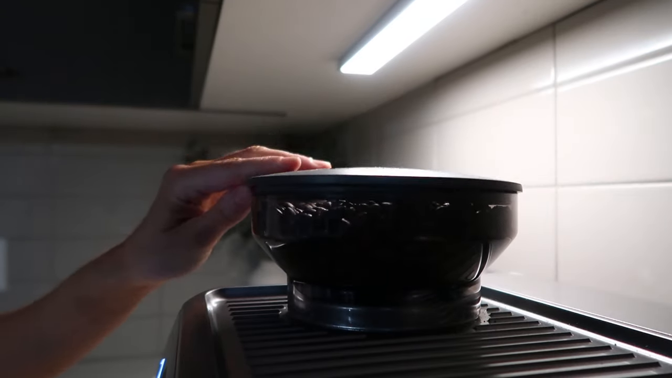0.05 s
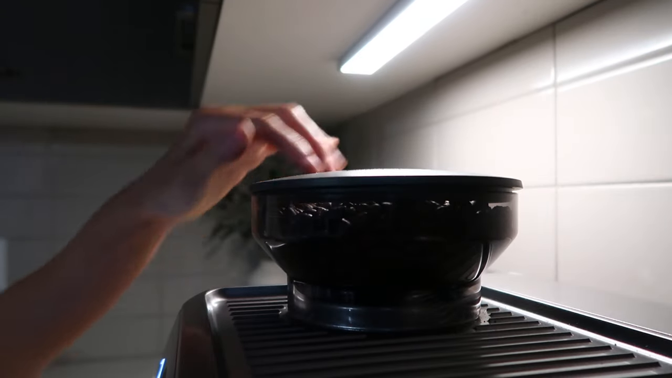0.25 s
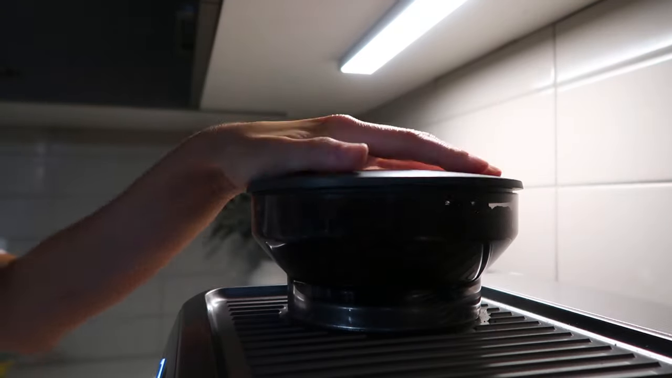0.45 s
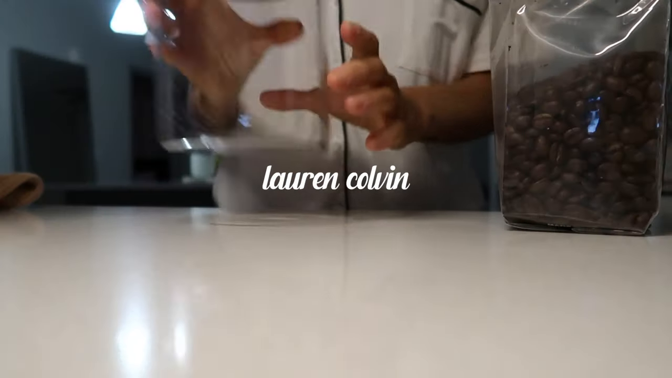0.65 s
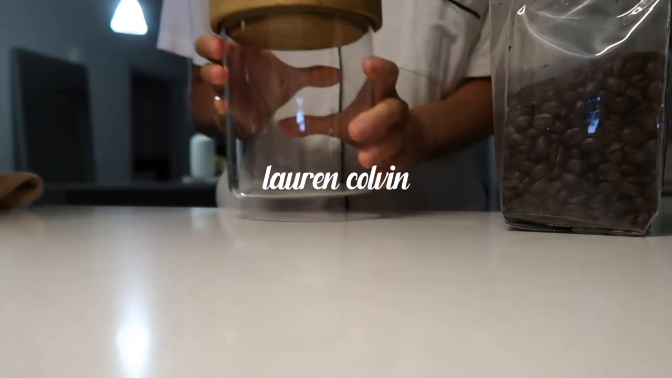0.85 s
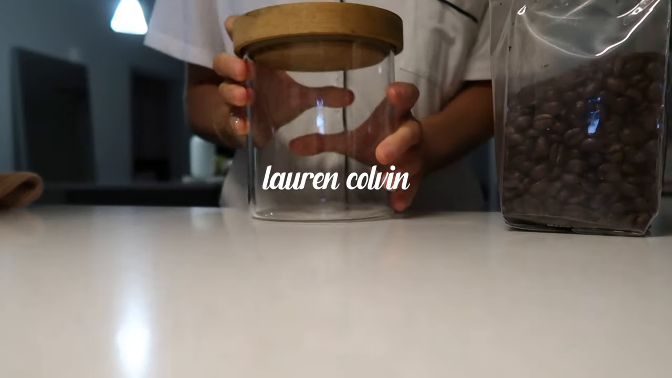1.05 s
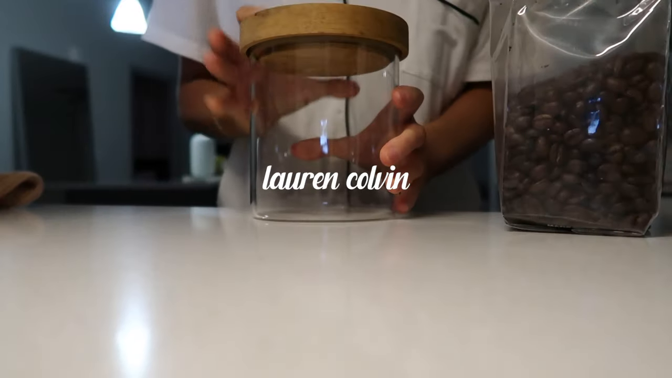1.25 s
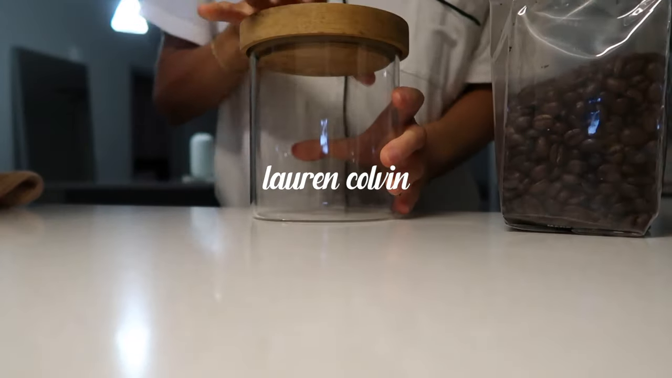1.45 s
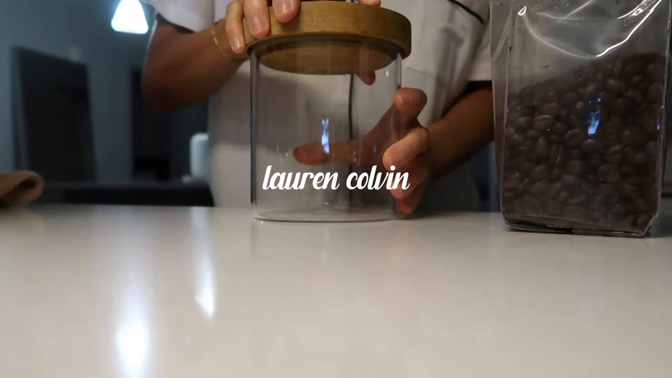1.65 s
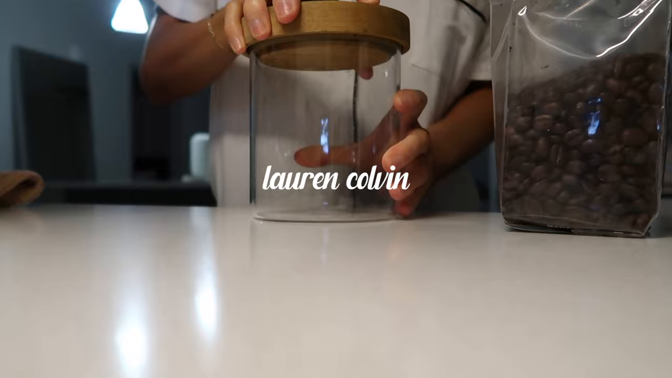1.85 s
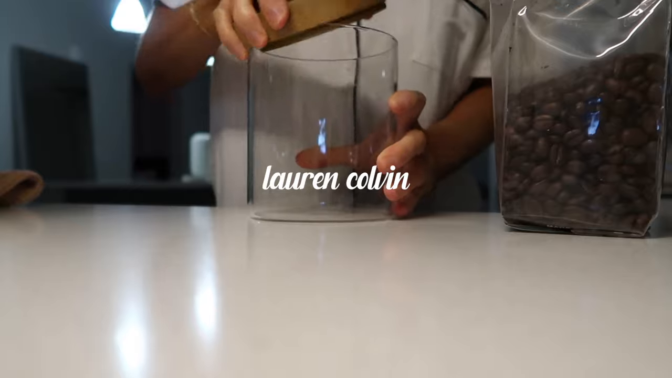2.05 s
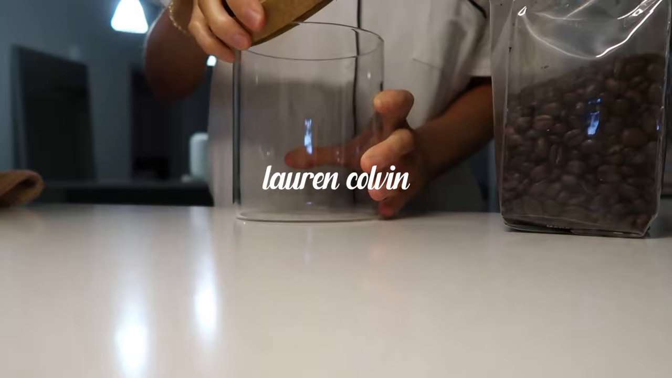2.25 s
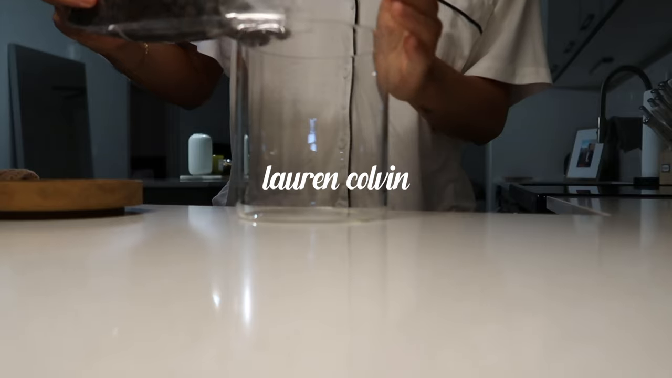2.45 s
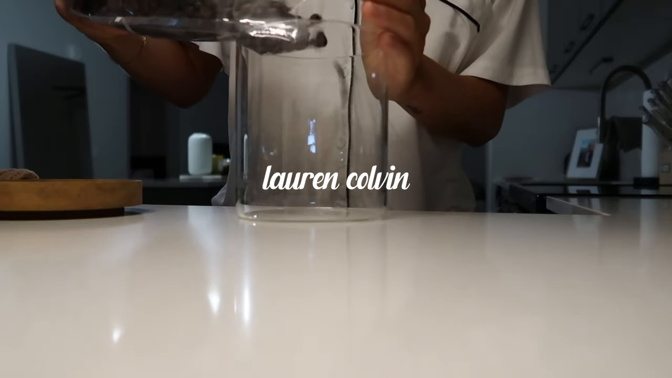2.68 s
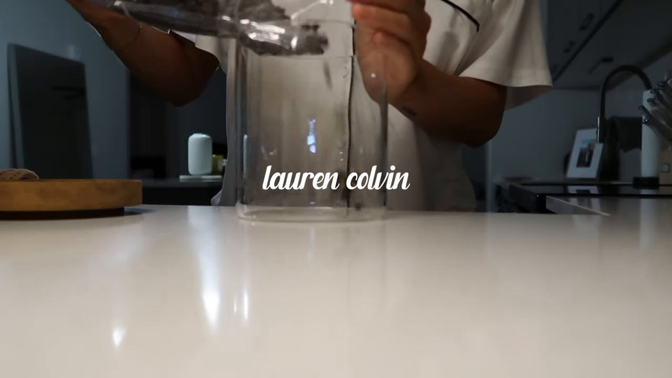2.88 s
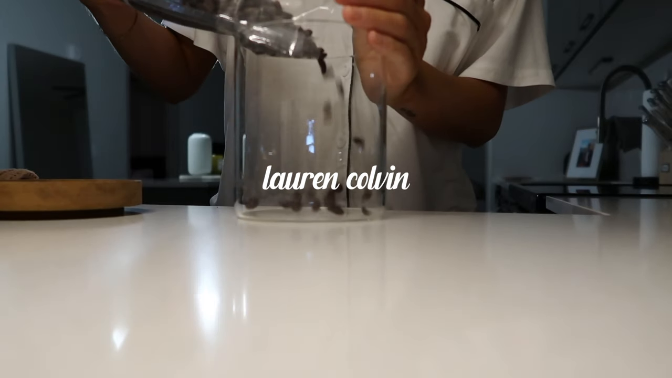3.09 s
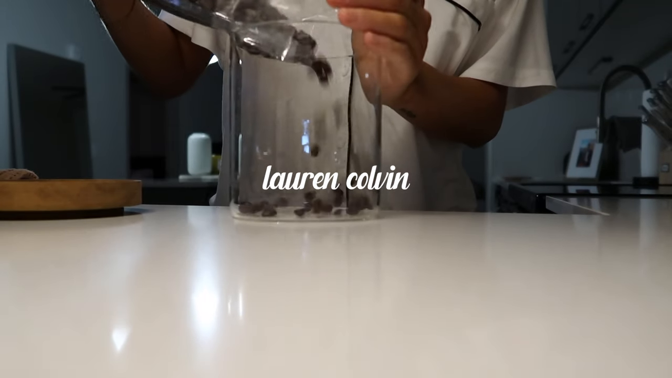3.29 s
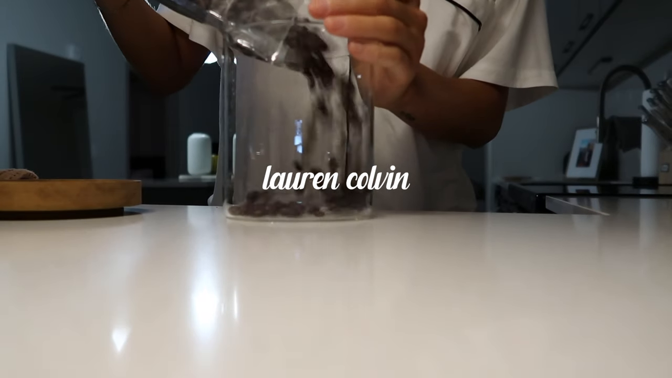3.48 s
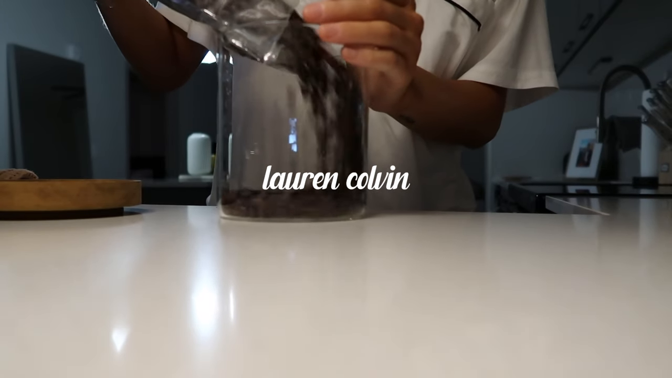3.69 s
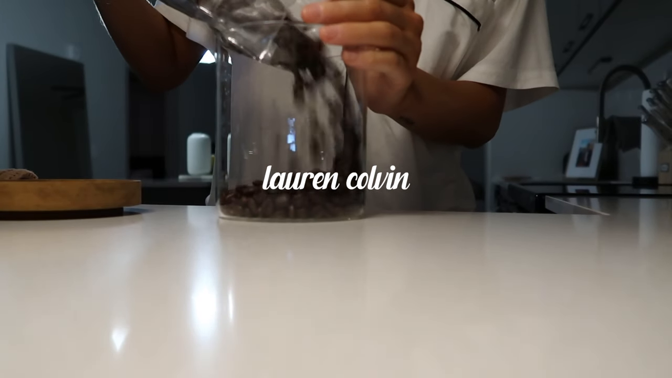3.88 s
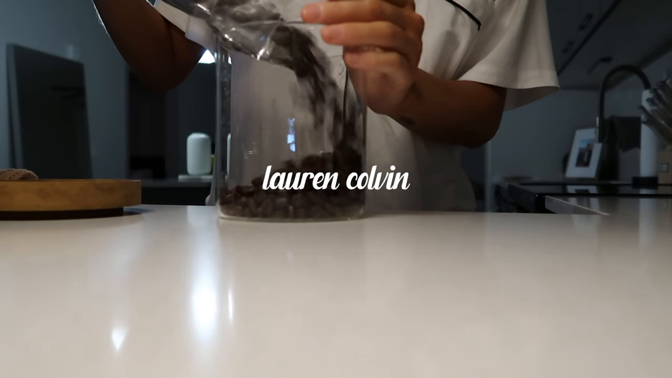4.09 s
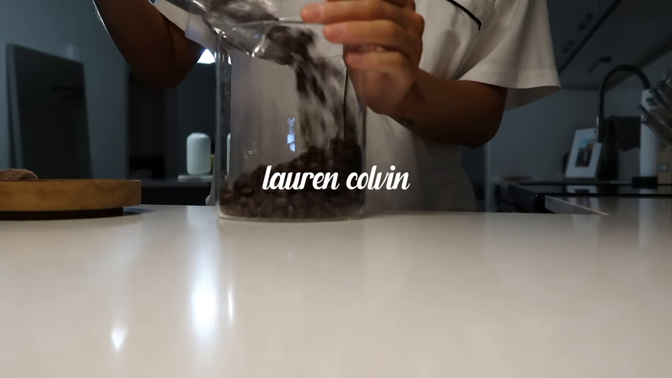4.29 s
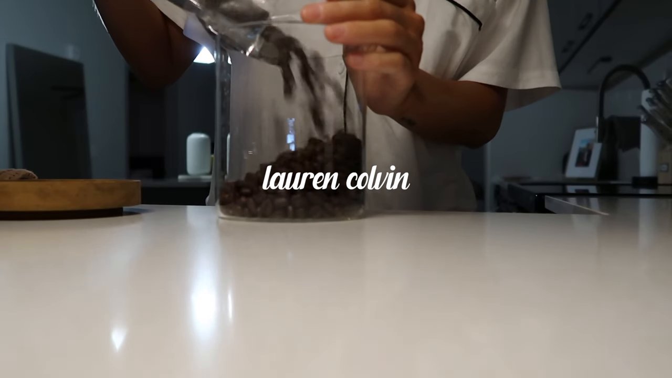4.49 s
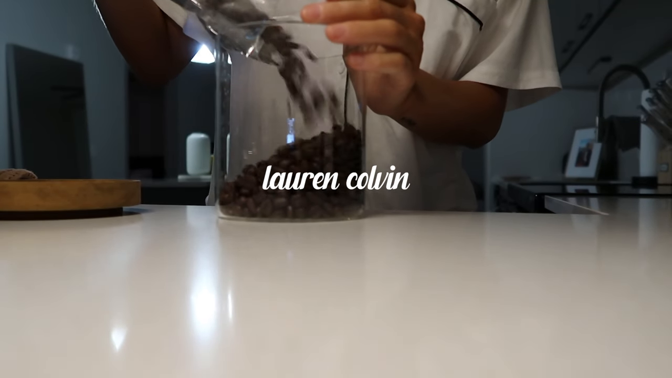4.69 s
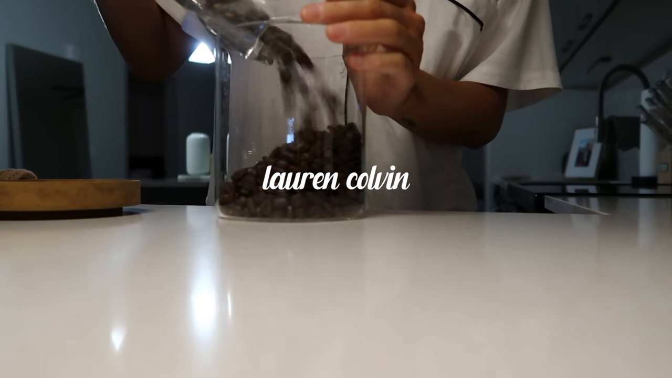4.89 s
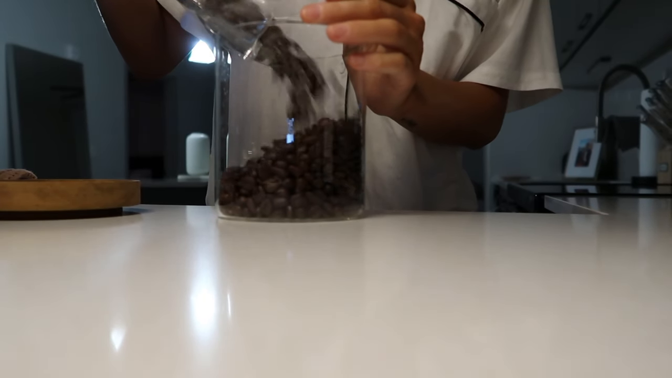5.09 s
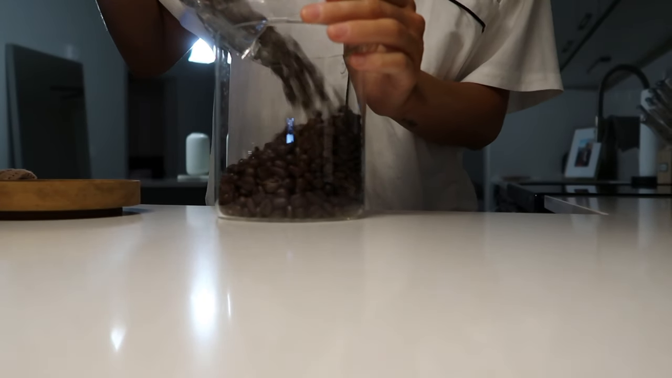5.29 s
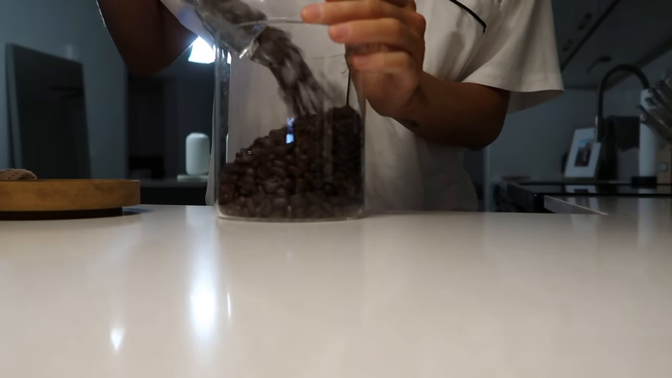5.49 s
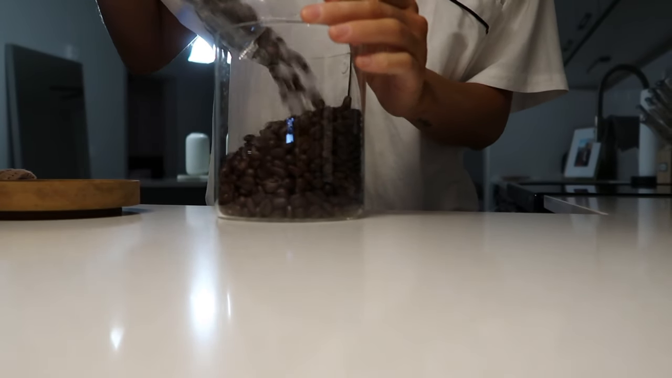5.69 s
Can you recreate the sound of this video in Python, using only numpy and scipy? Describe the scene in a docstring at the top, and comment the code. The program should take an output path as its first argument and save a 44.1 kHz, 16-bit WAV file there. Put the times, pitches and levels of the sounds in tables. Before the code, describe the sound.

A hand pats a plastic hopper lid, a glass jar and wooden lid knock on a counter, then coffee beans pour ringing into the jar.

```python
"""Coffee at a kitchen counter, heard from close by over a low hum. A hand pats a grinder's hopper lid (struck modes),
a glass jar is set down, its wooden lid knocks, its seal squeaks (wavering noise band) and pops, and the lid is laid aside.
Beans slide down a plastic bag (random impacts through crackle and modes), tick singly on the jar's bare base,
then swell to a stream whose collisions rattle, ring the glass wall and patter on the growing heap."""
import sys
import numpy as np
from scipy import signal
from scipy.fft import rfft, irfft, next_fast_len
from scipy.io import wavfile
from scipy.ndimage import uniform_filter1d

SR = 44100
rng = np.random.default_rng(int(sys.argv[2]) if len(sys.argv) > 2 else 0)


def unload_wav(signal):
    """Save mono or channel-first audio to the path in sys.argv[1] as 16-bit WAV at rate SR, clipped to [-1, 1]."""
    wavfile.write(
        sys.argv[1],
        SR,
        np.round(np.clip(np.atleast_2d(signal).T, -1, 1) * 32767).astype(np.int16),
    )


N = 253134
TIME = np.arange(N) / SR

# port difference against sum for blows, room tail and hum: freq_hz, ratio_db
KNOCK_WIDTH = [(60, -30), (400, -17.5), (3000, -16), (6000, -0.5), (12000, 7.5)]
POUR_START_S = 2.822
COVERED_S, COVERING_S = 3.895, 0.14   # base half muted by beans; how gradually


def from_db(db):
    """Decibels to gain."""
    return 10 ** (np.asarray(db) / 20)


def rms_one(x):
    """Scale to unit rms."""
    return x / np.sqrt(np.mean(x ** 2) + 1e-20)


def in_time(rows):
    """Each column of a curve at every sample."""
    s, *columns = np.transpose(rows)
    return [np.interp(TIME, s, column) for column in columns]


def at_hz(points, hz):
    """Read a spectrum on a log-frequency axis."""
    freq_hz, value = np.transpose(points)
    return np.interp(np.log(hz + 1), np.log(freq_hz), value)


def envelope(start_s, length_s, attack_s, release_db_per_s):
    """Linear attack, hold until length_s, release linear in dB."""
    age_s = TIME - start_s
    release_db = -release_db_per_s * np.maximum(age_s - length_s, 0)
    return np.clip(age_s / attack_s, 0, 1) * from_db(release_db)


def transition(middle_s, time_s):
    """Smooth change from 0 to 1."""
    return .5 + .5 * np.tanh((TIME - middle_s) / (2 * time_s))


def colour(x, spectrum):
    """Causal (minimum-phase) filter with the given gains."""
    size = 4096
    hz = np.arange(size // 2 + 1) * SR / size
    cepstrum = irfft(np.log(from_db(at_hz(spectrum, hz))))
    cepstrum[1:size // 2] *= 2   # fold to minimum phase
    cepstrum[size // 2 + 1:] = 0
    impulse_response = irfft(np.exp(rfft(cepstrum)))
    return signal.fftconvolve(x, impulse_response)[:N]


def resonance(x, hz, width_hz):
    """Two-pole resonance with gain 1 on top."""
    r = np.exp(-np.pi * width_hz / SR)
    zeros = np.array([1, 0, -1]) * (1 - r * r) / 2
    poles = [1, -2 * r * np.cos(2 * np.pi * hz / SR), r * r]
    return signal.lfilter(zeros, poles, x + 1e-18)


def clicks(seconds, level_db):
    """One impulse for each contact."""
    out = np.zeros(N)
    out[np.round(np.asarray(seconds) * SR).astype(int)] = from_db(level_db)
    return out


def chatter(seconds, level_db, bounce_s, loss_db, count=6):
    """A bean touches several times in quick succession, each touch loss_db below the last."""
    gaps_s = bounce_s * rng.uniform(.5, 1.5, (len(seconds), count))
    delays_s = np.cumsum(gaps_s, axis=1) - gaps_s[:, :1]
    return sum(clicks(seconds + delays_s[:, k], level_db - k * loss_db) for k in range(count))


def collisions(per_s, spread_db):
    """Random impacts of uneven size; rms 1."""
    born = rng.random(N) < per_s / SR
    size_db = spread_db * np.minimum(rng.exponential(1, N), 3)
    return rms_one(born * from_db(size_db) / np.sqrt(per_s))


def crackle(hits, t60_s):
    """Every impact becomes a dying burst of noise of the same energy."""
    r = from_db(-120 / (t60_s * SR))   # decay of power per sample
    power = signal.lfilter([1 - r], [1, -r], hits ** 2 + 1e-18)
    return np.sqrt(power) * rng.standard_normal(N)


def ring(hits, modes, spread_db):
    """Each impact lands on another spot, so it drives every mode with its own strength and sign."""
    at, out = np.flatnonzero(hits), np.zeros(N)
    for hz, width_hz, level_db in modes:
        drive = np.zeros(N)
        sign = rng.choice([-1, 1], len(at))
        strength_db = level_db + spread_db * rng.uniform(-0.73, 1, len(at))
        drive[at] = hits[at] * sign * from_db(strength_db)
        out += resonance(drive, hz, width_hz)
    return out


def ports(mid, side, width):
    """Two close microphone ports from sum and difference, whose ratio in dB follows width over frequency."""
    hz = np.geomspace(40, 16000, 60)
    ratio_db = at_hz(width, hz)
    mid_db = -10 * np.log10(1 + from_db(ratio_db) ** 2)
    common = colour(mid, np.c_[hz, mid_db])
    opposed = colour(side, np.c_[hz, mid_db + ratio_db])
    return common + opposed * [[1], [-1]]


def kitchen(x):
    """Diffuse tail of the hard-walled room: coloured sound convolved with decaying noise."""
    # wall reflection: freq_hz, level_db
    walls = [(80, -17), (400, 1), (1000, -8.5), (2000, -2), (3700, -3.5), (4400, -4.5), (9000, -8),
             (14000, -40.5)]
    t60_s, onset_s = 0.73, 0.0018
    t = TIME[:SR]
    tails = rng.standard_normal((2, SR)) * from_db(-60 * t / t60_s) * (1 - np.exp(-t / onset_s))
    dull = colour(x, walls)
    mid, side = [signal.fftconvolve(dull, tail / np.linalg.norm(tail))[:N] for tail in tails]
    return ports(mid, side, KNOCK_WIDTH)


def blows(rows, modes, level_db, crack_db, crack_t60_s, room_db):
    """Contacts ring a body and add a short crack; a softer contact is duller."""
    # crack colour: freq_hz, level_db
    thud = [(60, -16.5), (200, -7), (1000, -3), (2200, -6), (3700, -7), (4500, -15), (9000, -25.5),
            (15000, -32)]
    force, cracks = np.zeros(N), np.zeros((2, N))
    t = TIME[:SR // 4]
    for s, blow_db, bright_hz in rows:
        at = round(max(s, 0) * SR)
        span = slice(at, at + len(t))
        soft = np.exp(-2 * np.pi * bright_hz / SR)   # one-pole low-pass
        decay = from_db(-60 * t / crack_t60_s)
        burst = decay / np.linalg.norm(decay) * rng.standard_normal((2, len(t)))
        force[span] += from_db(blow_db) * (1 - soft) * soft ** np.arange(len(t))
        cracks[:, span] += from_db(blow_db) * signal.lfilter([1 - soft], [1, -soft], burst)
    body = np.zeros(N)
    for k, (hz, width_hz, mode_db) in enumerate(modes):
        body += (-1) ** k * from_db(mode_db) * resonance(force, hz, width_hz)
    mid, side = [from_db(level_db) * (body + from_db(crack_db) * colour(crack, thud)) for crack in cracks]
    return ports(mid, side, KNOCK_WIDTH) + from_db(room_db) * kitchen(mid)


def palm():
    """Palm brushing over the plastic hopper lid: a dull, short rustle of band-passed noise."""
    hz, width_hz, level_db = 262, 175, -35
    friction = resonance(rng.standard_normal(N), hz, width_hz)
    friction = resonance(friction, hz, width_hz)
    stroke = envelope(0, length_s=0.1, attack_s=0.003, release_db_per_s=108)
    return from_db(level_db) * rms_one(friction) * stroke


def hum():
    """Low rumble of coloured noise with mains lines; its level steps up and down, nearly gone early in the pour."""
    # rumble: freq_hz, level_db (per Hz)
    rumble_spectrum = [(15, -73.5), (25, -19), (42, -22), (65, -3.5), (151, -29), (237, -16.5), (392, -25),
                       (460, -26), (498, -27), (824, -36.5), (1130, -36), (1510, -45.5), (3350, -46.5),
                       (14000, -61.5)]
    # steady lines: freq_hz, level_db (against the rumble)
    mains = [(59.5, -13), (119, -10.5)]
    # held levels: start_s, level_db
    steps = [(0, -39.5), (1.08, -47.5), (2.1, -60), (2.39, -42), (3.055, -76)]
    step_s = 0.024
    level_db = np.full(N, float(steps[0][1]))
    for s, step_db in steps:
        level_db[TIME >= s] = step_db
    mid, side = [colour(rng.standard_normal(N), rumble_spectrum) for _ in range(2)]
    rumble = rms_one(ports(mid, side, KNOCK_WIDTH))
    lines = np.zeros(N)
    for hz, db in mains:
        lines += from_db(db) * np.sqrt(2) * np.sin(2 * np.pi * (hz * TIME + rng.random()))
    return from_db(uniform_filter1d(level_db, int(step_s * SR))) * (rumble + lines)


def hopper_lid():
    """Hand pats the hopper lid shut: soft blows ring its low modes."""
    # pats: start_s, level_db, brightness_hz
    pats = [(.001, -7, 900), (.070, -10.5, 3000), (.0945, -6, 895), (.105, -8.5, 600), (.142, -10, 1470),
            (.148, 0, 160), (.165, -12, 1400), (.268, -18, 1400), (.4925, 9, 150), (.4955, -7.5, 3020),
            (.503, -11, 1500), (.520, -9.5, 250), (.535, -12, 303.5)]
    # hopper modes: freq_hz, width_hz, level_db
    hopper = [(62, 18, -25), (144, 28, 1.5), (162, 44, -4), (252, 11, -4.5), (333, 25, -19.5),
              (455, 75, -16.5), (650, 55, -19), (890, 130, -22.5), (1850, 66, -26.5), (2040, 49, -27)]
    return blows(pats, hopper, level_db=35.5, crack_db=-24.5, crack_t60_s=0.1, room_db=-9.5)


def dry_click():
    """A faint, dry click after the last pat: one coloured impulse."""
    # click colour: freq_hz, level_db
    spectrum = [(300, 11), (3000, 4), (15000, -11)]
    return colour(clicks([0.5518], -22), spectrum)


def set_downs():
    """Jar, then its lid, meet the counter and ring it; the walls return the crack as a diffuse wash."""
    # contacts: start_s, level_db, brightness_hz
    contacts = [(1.0766, 2, 9100), (1.0799, -2, 5060), (2.1106, -3.5, 2400), (2.1164, -12, 1800)]
    # counter modes: freq_hz, width_hz, level_db
    counter = [(236, 8, -12.5), (409.5, 22, 5.5), (478, 29, 2), (668.6, 22, -3.5), (1120, 75, -17.5),
               (1289, 170, -9), (1760, 26, -1), (1850, 160, -0.5), (2360, 600, -7), (2440, 100, -17.5),
               (3450, 300, 0), (3650, 180, 1), (4600, 300, -20.5), (8450, 810, -27)]
    # wash colour: freq_hz, level_db (per Hz)
    wash_spectrum = [(200, -15.5), (450, -3.5), (1000, 0.5), (1550, -0.5), (1830, 8), (2050, -2.5),
                     (2350, -2), (2700, -5.5), (3200, 3), (3700, 3), (4100, -17), (8000, -20.5),
                     (12000, -33)]
    wash_db = 12
    s, contact_db, _ = np.transpose(contacts)
    wash = kitchen(colour(clicks(s, contact_db + wash_db), wash_spectrum))
    return blows(contacts, counter, level_db=37.0, crack_db=-7.0, crack_t60_s=0.055, room_db=-17) + wash


def lid_knocks():
    """Fingers knock the wooden lid against the rim and ring its modes."""
    # knocks: start_s, level_db, brightness_hz
    knocks = [(1.192, -6, 1200), (1.212, 0.5, 1100), (1.226, 2, 1100), (1.237, -23, 600),
              (1.282, -5.5, 1500), (1.303, -16, 900), (1.572, -5.5, 800), (1.578, -12, 697),
              (1.605, 1.5, 2160), (1.612, -20, 1300), (1.673, -7.5, 895), (2.104, 8.5, 2480),
              (2.364, -14, 1200)]
    # lid modes: freq_hz, width_hz, level_db
    lid = [(241, 10.6, 3), (411, 45, 1), (479, 21, 0.5), (683, 17, 4), (948, 42, 3), (1314, 126, -2),
           (1910, 200, -11.5)]
    return blows(knocks, lid, level_db=15.0, crack_db=-9.5, crack_t60_s=0.11, room_db=-6.5)


def seal():
    """Rubber seal slips on glass: a faint squeak in a wider scuff, noise on a carrier of wavering pitch."""
    # slips: start_s, pitch_hz, level_db
    slips = [(1.71, 3900, -82), (1.74, 4150, -58), (1.78, 4400, -65), (1.812, 4070, -64),
             (1.832, 4020, -62), (1.87, 4280, -59), (1.905, 4450, -58), (1.932, 4230, -57.5),
             (1.955, 4150, -81), (1.985, 4180, -57), (2.02, 4350, -80)]
    hz, level_db = in_time(slips)
    phase = 2 * np.pi * np.cumsum(hz) / SR
    out = np.zeros(N)
    for half_width_hz, part_db in (190, 0), (700, -3.5):   # squeak, scuff
        lowpass = signal.butter(2, half_width_hz, fs=SR, output="sos")
        hoarse = signal.sosfilt(lowpass, rng.standard_normal((2, N)))
        out += from_db(part_db) * rms_one(hoarse[0] * np.sin(phase) + hoarse[1] * np.cos(phase))
    return out * from_db(level_db) * (TIME > slips[0][0]) * (TIME < slips[-1][0])


def lid_pops():
    """Seal lets go and the lid clips the rim, ringing the opened jar."""
    # contacts: start_s, level_db, brightness_hz
    pops = [(1.9925, -24, 2500), (1.9975, -8.5, 5000), (2.004, -27, 5040), (2.002, -6.5, 400),
            (2.010, 4, 300), (2.0133, 1.5, 4930), (2.0182, -1, 1500)]
    # open jar modes: freq_hz, width_hz, level_db
    open_jar = [(83.5, 19, 1), (241, 42, -1.5), (300, 24, -1), (335, 18, -1), (480, 26, 2.5),
                (1075, 86, -1), (1163, 190, -5.5), (1625, 44, -10), (1760, 57, -10.5), (3107, 72, -2),
                (4510, 41, -12), (5000, 49, -11)]
    return blows(pops, open_jar, level_db=35, crack_db=-12.5, crack_t60_s=0.074, room_db=-14.5)


def bag():
    """Beans tumble along the plastic, whose hollow booms; creases snap; the rustle fades as beans settle into sliding."""
    # bag tipped: start_s, length_s, rustle_db, boom_db
    slides = [(2.385, 0.47, -13.5, -8.5), (3.206, 0.31, -44.5, -21)]
    # crease snaps: start_s, level_db
    creases = [(2.394, -1.5), (2.425, -3), (2.427, -2), (2.554, 1.5), (2.657, -2), (2.665, -7)]
    # hollow modes: freq_hz, width_hz, level_db
    hollow_modes = [(504, 30, 3.5), (647, 17, -5), (1163, 59, -8.5), (1810, 63, -16), (2300, 19, -23)]
    # rustle colour: freq_hz, level_db
    rustle_spectrum = [(60, -28), (200, 0), (450, 4.5), (1200, 3), (1600, 1), (3800, 0), (5200, -7),
                       (6200, -15.5), (9000, -14), (11000, -12.5), (12600, -19), (15000, -19)]
    # port difference against sum: freq_hz, ratio_db
    width = [(100, -19), (600, -21), (3500, -13.5), (5500, 4.5), (8000, -0.5), (10500, 34), (15000, 61)]
    rustle_fade_db_per_s = 38
    rustle_gain, boom_gain = np.zeros((2, N))
    for s, length_s, rustle_db, boom_db in slides:
        sliding = envelope(s, length_s, attack_s=0.0041, release_db_per_s=119)
        rustle_gain += sliding * from_db(rustle_db - rustle_fade_db_per_s * np.maximum(TIME - s, 0))
        boom_gain += sliding * from_db(boom_db)
    tumble = collisions(2000, spread_db=2.5)
    snaps = from_db(9.5) * clicks(*np.transpose(creases))
    hollow = ring(tumble * boom_gain + snaps, hollow_modes, spread_db=-1.5)
    heard = []
    for _ in range(2):   # sum and difference of the ports
        rustle = crackle(tumble * rustle_gain, t60_s=0.025) + crackle(snaps, t60_s=0.018)
        heard.append(colour(rustle, rustle_spectrum) + hollow)
    return ports(*heard, width)


def clinks():
    """Single beans bounce on the bare base with a crack and own pitch, others graze the rim; returns base force, sound."""
    # landings: start_s, level_db, pitch_hz, loss_db (per bounce)
    base_hits = [(2.826, -16, 4420, 0), (2.843, -15, 4230, -0.5), (2.8574, -4.5, 3500, 3.5),
                 (2.9198, -11, 3000, 2.5), (2.9268, -5, 3380, 2.5), (2.9846, -18, 2600, 1.5),
                 (3.004, -14, 3750, 2), (3.024, -15.5, 3320, 4), (3.0407, -20.5, 3650, -1),
                 (3.0693, -4, 3400, 3), (3.1199, -6, 2994, 1.5), (3.1357, -13.5, 3600, 1),
                 (3.147, -16.5, 3800, 0), (3.1707, -11, 3100, 4.5), (3.182, -19, 3800, 3),
                 (3.2147, -7, 3400, 5.5), (3.232, -14, 2400, 7), (3.2726, -18, 4000, 2),
                 (3.3018, -17, 3300, 9), (3.318, -11, 2870, 2.5), (3.334, -16, 2500, 4),
                 (3.3523, -10, 3495, 5), (3.441, -12.5, 3900, 0.5), (3.456, -12, 3000, 1.5),
                 (3.4788, -9.5, 3800, 6), (3.5085, -11.5, 3840, 0.5), (3.5239, -10.5, 3701, 10),
                 (3.587, -12, 3900, 0)]
    # crack colour: freq_hz, level_db (per Hz)
    crack_spectrum = [(300, -25), (1000, -7.5), (1700, -15.5), (2300, -2), (4000, 2), (5200, -12),
                      (9000, -28), (14000, -23)]
    # beans graze the rim leaving the bag: start_s, level_db
    rim_ticks = [(2.815, 21), (2.978, 13), (2.993, 22), (3.046, 25), (3.254, 14), (3.374, 25), (3.395, 17)]
    clink_db, clink_width_hz, crack_db = 21.5, 380, 12.5
    rim_hz, rim_width_hz = 4580, 21
    force, sound = np.zeros((2, N))
    for s, level_db, hz, loss_db in base_hits:
        touches = chatter(np.array([s]), level_db, bounce_s=.0026, loss_db=loss_db)
        force += touches
        sound += from_db(clink_db) * resonance(touches, hz, clink_width_hz)
    crack = from_db(crack_db) * colour(crackle(force, t60_s=0.014), crack_spectrum)
    rim = resonance(clicks(*np.transpose(rim_ticks)), rim_hz, rim_width_hz)
    return force, sound + crack + rim


def impacts(first):
    """Flow sets rate and force of collisions on beans, base, wall and heap; the heap soon mutes the base."""
    # stream strength: start_s, level_db
    flow = [(2.83, -41), (3.12, -40), (3.3, -37), (3.63, -36), (3.83, -42), (4.13, -44), (4.68, -42),
            (5.36, -35), (5.74, -35)]
    # loudest beans flung at the wall: start_s, ping_db, contact_db
    wall_hits = [(3.559, -26, -32), (3.609, -23, -20), (3.6305, -16, -24), (3.661, -23, -22),
                 (3.699, -20, -23), (3.7221, -17, -26), (3.793, -24, -24), (3.821, -30, -22.5),
                 (3.852, -22, -23.5), (3.884, -21, -27), (3.977, -28, -34), (4.016, -27, -27),
                 (4.056, -23, -26.5), (4.109, -23, -28), (4.153, -26.5, -29), (4.199, -35, -25.5),
                 (4.223, -29, -26), (4.258, -31.5, -42), (4.297, -30, -31), (4.3465, -27.5, -22),
                 (4.361, -24, -27.5), (4.396, -30, -29), (4.4312, -17.5, -24), (4.5529, -25, -23.5),
                 (4.6521, -24, -32), (4.689, -31, -35), (4.723, -26.5, -30), (4.771, -26.5, -28),
                 (4.829, -32, -33), (4.8573, -23.5, -29), (4.8985, -26.5, -22), (4.930, -30, -33),
                 (4.971, -27, -33), (5.013, -30, -25), (5.036, -30, -24.5), (5.0747, -25.5, -23),
                 (5.123, -24.5, -24.5), (5.155, -29, -22), (5.183, -22, -20), (5.210, -20.5, -24),
                 (5.245, -20.5, -23.5), (5.2745, -22.5, -25), (5.316, -22, -21), (5.352, -30, -21),
                 (5.368, -17, -21.5), (5.402, -21.5, -32), (5.464, -24.5, -33), (5.537, -20.5, -24),
                 (5.584, -20.5, -22), (5.617, -21, -22.5), (5.675, -22, -23), (5.702, -21.5, -27)]
    # levels are at mean flow; "follows" is the share of the flow's swing
    collisions_per_s, rate_follows = 750, .7
    trickle_db, full_stream_s = -8, 3.62   # starts weaker, builds up until then
    reach_wall_s, reaching_s = 3.54, 0.016   # stream arcs far enough to hit the wall
    strays_per_s, stray_db = 10, -29.5   # single beans that glance off the wall
    rattle_db, base_db = -19.5, -14.5
    wall_db, wall_follows = -7, 0.031
    high_wall_db, high_wall_follows = -2.5, 0.35
    heap_db, heap_follows, heap_rise_db_per_s = -29.5, 0.7, 3.5   # heap climbs to the mouth
    base_hit_ring_db, base_hit_click_db = 23.5, 9
    wall_hit_ring_db, wall_hit_low_ring_db, wall_hit_click_db = 43.5, 57.5, 24.5

    flow_db, = in_time(flow)
    build_up_db = np.interp(TIME, [POUR_START_S, full_stream_s], [trickle_db, 0])
    surge_db = flow_db - flow_db[TIME > POUR_START_S].mean() + build_up_db
    bare = 1 - 0.9 * transition(COVERED_S, COVERING_S)
    at_wall = transition(reach_wall_s, reaching_s)
    stream = collisions(collisions_per_s * from_db(rate_follows * surge_db), spread_db=0.5)
    stream = stream * (TIME > POUR_START_S)

    strays_s = TIME[(rng.random(N) < at_wall * strays_per_s / SR) & (TIME < TIME[-1] - .1)]
    s, ping_db, contact_db = np.transpose(wall_hits)
    flung_db = np.r_[contact_db, np.full(len(strays_s), stray_db)]
    flung = chatter(np.r_[s, strays_s], flung_db, bounce_s=.0028, loss_db=1.55)

    on_beans = stream * from_db(surge_db + rattle_db)
    on_beans += from_db(base_hit_click_db) * first + from_db(wall_hit_click_db) * flung
    on_base = stream * bare * from_db(surge_db + base_db) + from_db(base_hit_ring_db) * first
    on_wall = stream * at_wall * from_db(wall_db + wall_follows * surge_db)
    on_wall += from_db(wall_hit_ring_db) * flung
    high_on_wall = stream * at_wall * from_db(high_wall_db + high_wall_follows * surge_db)
    high_on_wall += clicks(s, ping_db + wall_hit_low_ring_db)
    rise_db = heap_rise_db_per_s * (TIME - COVERED_S)
    on_heap = stream * from_db(heap_db + heap_follows * surge_db + rise_db)
    return on_beans, on_base, on_wall, high_on_wall, on_heap, bare


def ping(hits):
    """Two close, coupled wall modes: the ring swells for a moment, then beats away over a longer, quieter note."""
    # lowest wall mode, split in two: freq_hz, width_hz
    pair = [(3084, 31), (3110, 42)]
    sustain_hz, sustain_width_hz, sustain_db = 3094, 11, -9
    swell = hits
    for hz, width_hz in pair:
        swell = resonance(swell, hz, width_hz)
    return swell + from_db(sustain_db) * resonance(hits, sustain_hz, sustain_width_hz)


def lean(pair):
    """The jar's upper ring reaches the right port more strongly."""
    # left minus right: freq_hz, level_db
    balance = [(3000, 0), (4150, 0), (4450, -4.5), (5000, -4), (5600, -1), (7000, -1.8), (9000, 0)]
    size = 2 * next_fast_len(N // 2 + SR // 20)
    lean_db = at_hz(balance, np.arange(size // 2 + 1) * SR / size)
    return irfft(rfft(pair, size) * from_db([lean_db / 2, -lean_db / 2]))[:, :N]


def pour():
    """One stream of collisions rattles, rings glass and the jar's air, and patters on the heap."""
    # modes of base, wall, foot (shallow heap), wall under a deep heap: freq_hz, width_hz, level_db
    base_modes = [(2272, 39, -2.5), (2890, 84, -9), (3200, 110, -8), (3555, 37, -11), (3590, 150, -7.5),
                  (3780, 66, 4), (4590, 38, -1.5), (5080, 78, -12), (5624, 89, 2.5), (6280, 32, 3.5),
                  (8030, 89, -22), (8520, 92, 5), (9120, 137, 3.5), (10600, 39, 0), (10700, 9.3, 1),
                  (12400, 93, -11), (12370, 30, 10), (12600, 110, -11), (13800, 91, -6)]
    wall_modes = [(3660, 84, -24), (4170, 36, -15), (4474, 44, -5.5), (4520, 98, -7), (4660, 64, -16),
                  (4942, 32, -0.5), (5910, 31, -3.5), (7160, 27.5, -5), (7770, 59, -15), (8070, 67, -10.5),
                  (8320, 71, -15), (9920, 47, -2.5), (9900, 74, -6), (10650, 35, -9), (13600, 36, -1.5),
                  (15400, 34, -3.5)]
    foot_modes = [(4350, 20, 5.3)]
    loaded_modes = [(4408, 42, -3.5), (4508, 67, -8), (4640, 60, -8)]
    # air column, shorter as the jar fills: freq_hz, width_hz, level_db
    air_empty = [(501, 19, 1.5), (1086, 150, -4)]
    air_filled = [(647.6, 20, -1.5), (820, 8, -36), (1179, 81, -6)]
    # colours of bean on bean and of the heap: freq_hz, level_db
    rattle_spectrum = [(300, -43.5), (1200, -20), (2200, -7.5), (4400, -10), (5400, -10), (6500, -11.5),
                       (8500, -11.5), (10700, -17), (11600, -65), (12600, 10), (14000, -23), (15500, -17)]
    heap_spectrum = [(60, -37), (180, -22.5), (350, -8), (550, -0.5), (850, -3), (1200, -4), (2000, -4.5),
                     (3500, -3), (6000, -40)]
    # port difference against sum: freq_hz, ratio_db
    width = [(500, -60), (3100, -51), (3750, -8.5), (4450, -9), (4950, -2), (5800, 14), (7100, -3),
             (8400, 13.5), (10500, 21.5), (15000, 25)]
    foot_buried_s = 4.49

    first, clinking = clinks()
    on_beans, on_base, on_wall, high_on_wall, on_heap, bare = impacts(first)
    deep = transition(foot_buried_s, COVERING_S)
    shallow = transition(COVERED_S, COVERING_S) - deep
    highpass = signal.butter(2, 1300, "high", fs=SR, output="sos")   # thin glass radiates no bass
    heard = []
    for _ in range(2):   # sum and difference of the ports
        glass = ring(on_base, base_modes, spread_db=7.0)
        glass += ring(on_wall, wall_modes, spread_db=4.5)
        glass += ping(high_on_wall)
        glass += ring(on_wall * shallow, foot_modes, spread_db=7.0)
        glass += ring(on_wall * deep, loaded_modes, spread_db=3.0)
        glass = signal.sosfilt(highpass, glass)
        air = ring(on_heap * bare, air_empty, spread_db=2.5)
        air += ring(on_heap * (1 - bare), air_filled, spread_db=9.0)
        rattle = colour(crackle(on_beans, t60_s=0.04), rattle_spectrum)
        patter = colour(crackle(on_heap, t60_s=0.045), heap_spectrum)
        heard.append(glass + from_db(8.0) * air + rattle + patter)
    direct = lean(ports(*heard, width) + clinking)
    return direct + from_db(-15.5) * kitchen(heard[0] + clinking)


def scene():
    """All sources at the microphone."""
    handling = hopper_lid() + set_downs() + lid_knocks() + lid_pops()
    return palm() + hum() + dry_click() + handling + seal() + bag() + pour()


def record(dry):
    """Peaks near full scale overload smoothly; the top is cut."""
    cutoff_hz = 15600
    clipped = dry / (1 + dry ** 8) ** (1 / 8)
    lowpass = signal.ellip(10, .2, 70, cutoff_hz, fs=SR, output="sos")
    return signal.sosfilt(lowpass, clipped)


dry = scene()
out = record(dry)
unload_wav(out)
```